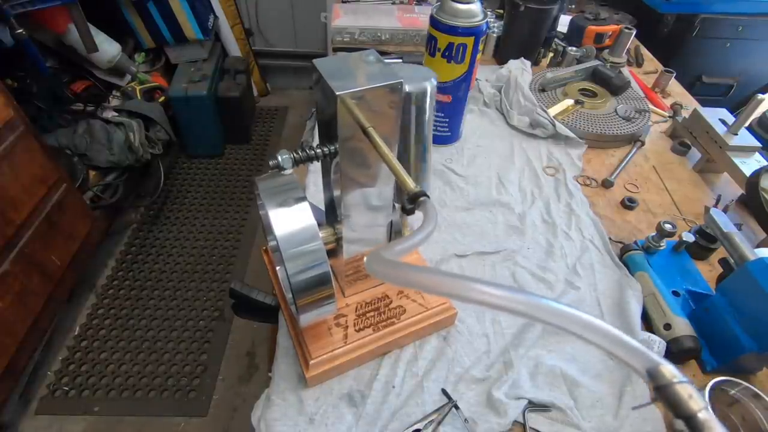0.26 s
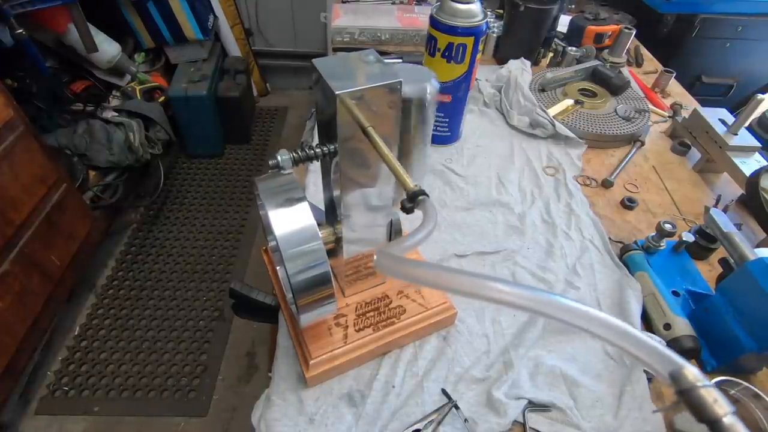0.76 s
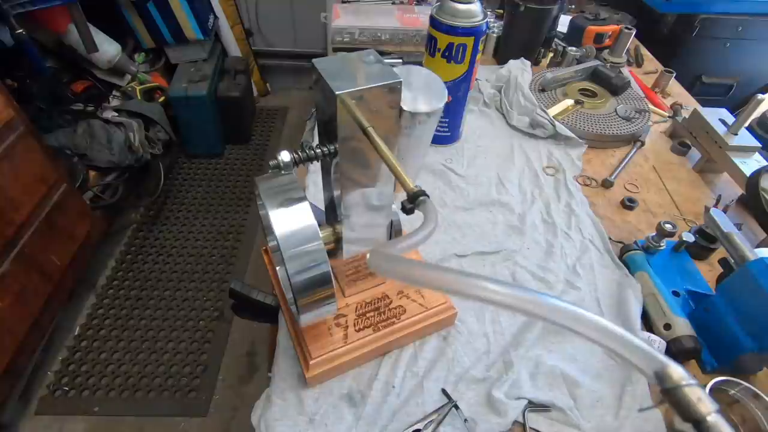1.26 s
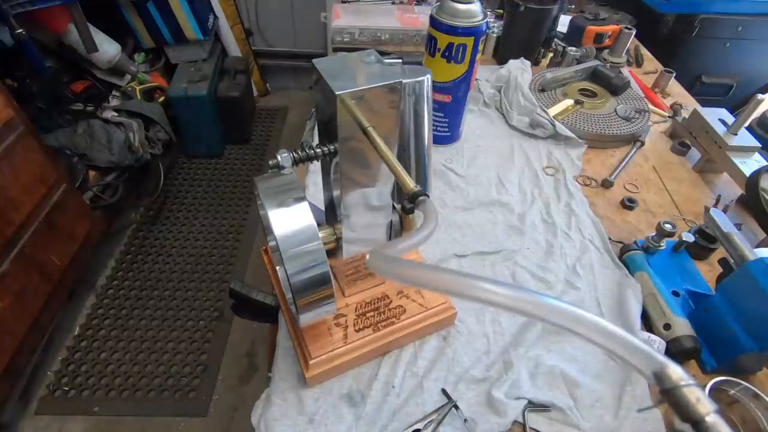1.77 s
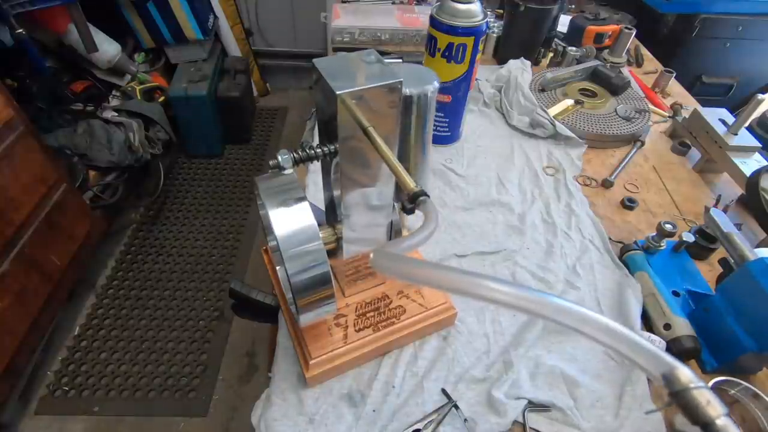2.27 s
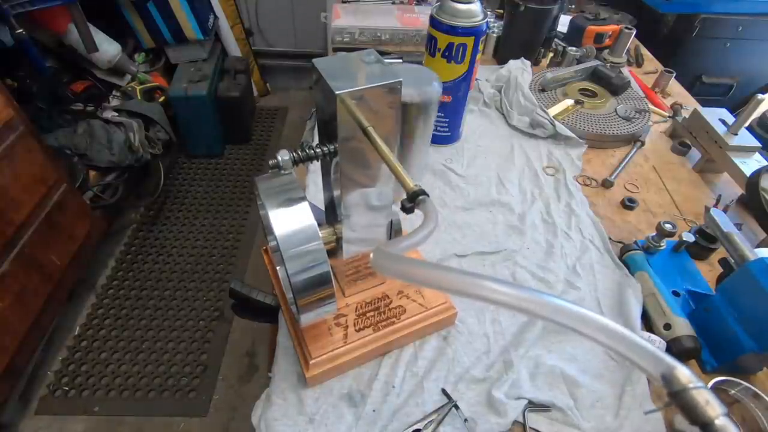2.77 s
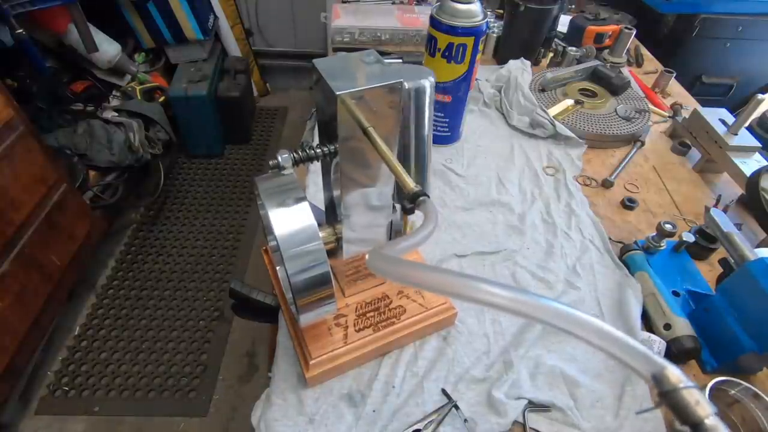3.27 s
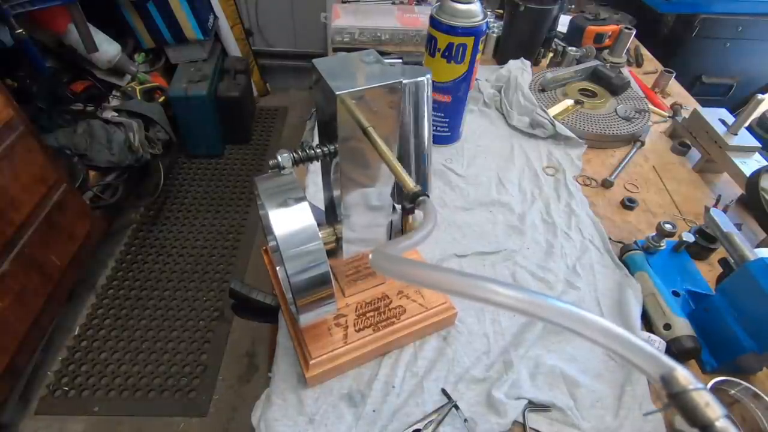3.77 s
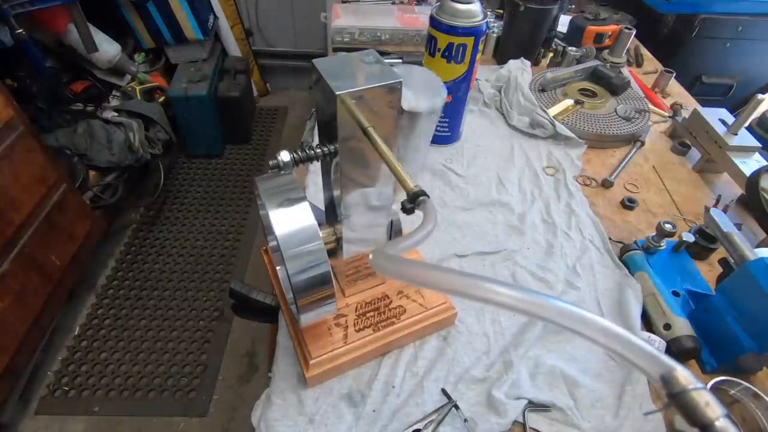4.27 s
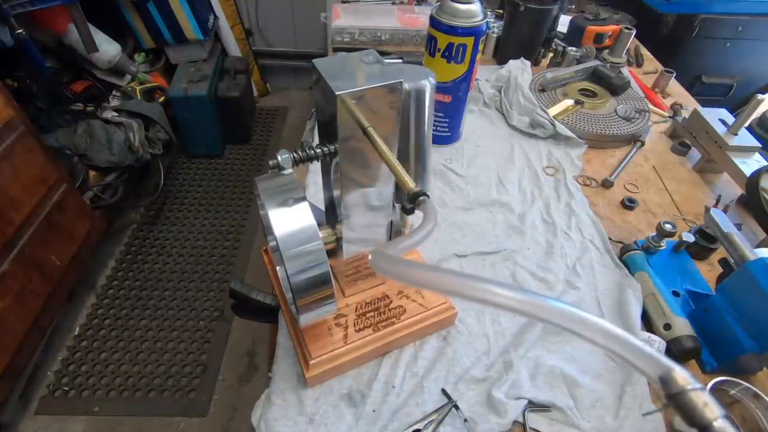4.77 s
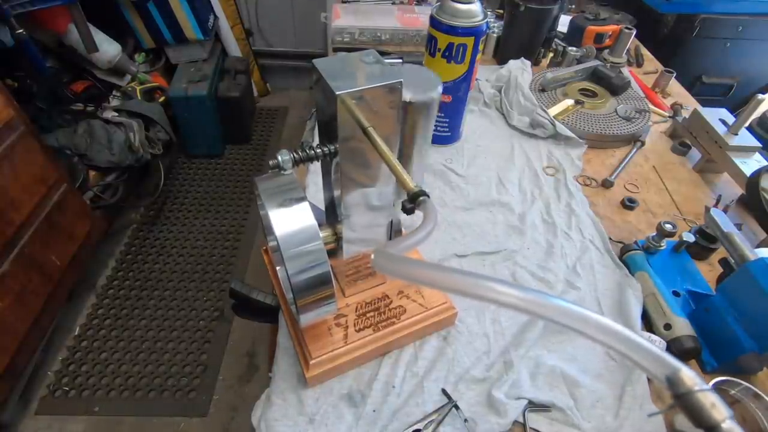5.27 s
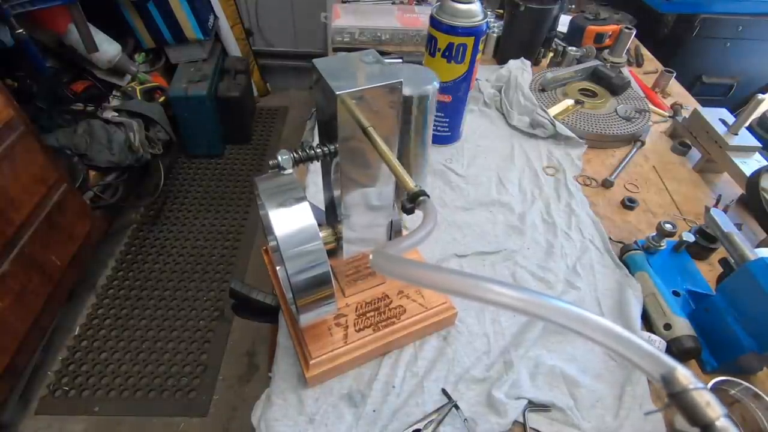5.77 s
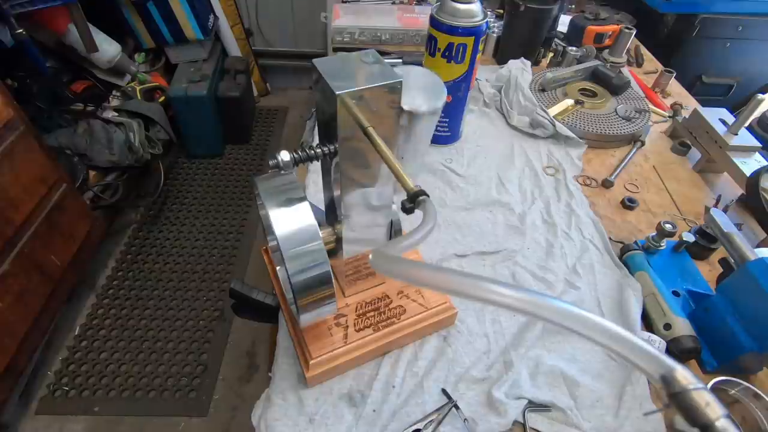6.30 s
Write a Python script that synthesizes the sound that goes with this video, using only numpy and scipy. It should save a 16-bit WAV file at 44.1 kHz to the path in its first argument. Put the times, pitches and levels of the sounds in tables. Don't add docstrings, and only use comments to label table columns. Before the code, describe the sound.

A tiny engine runs on compressed air close to the microphone, a buzzing stream of crisp double puffs with rattling metal and throbbing bench wood. The first two seconds are mostly fast and strong, with one quick sag. Then power and pace lurch up and down, hiss fading and bursting back, with sparse snaps near three and four seconds. One deep sag comes late, then a steadier, weaker chug in a small garage.

```python
import sys
import numpy as np
from scipy import signal
from scipy.fft import rfft, irfft, next_fast_len
from scipy.io import wavfile
from scipy.ndimage import uniform_filter1d

SR = 44100
rng = np.random.default_rng(int(sys.argv[2]) if len(sys.argv) > 2 else 0)


def transcribe(signal):
    frames = np.atleast_2d(signal).T
    limited = np.clip(frames, -1, 1)
    pcm = np.round(limited * 32767).astype(np.int16)
    wavfile.write(sys.argv[1], SR, pcm)


def volts_from_decibels(level):
    exponent = np.asarray(level, float) / 20
    return 10 ** exponent


N = 288394
TURN_COUNT = 128
CLOCK = np.arange(-.1, 6.7, .001)

# start_s, speed_turns_per_s
VALVE_MOVES = [(-0.215, 23.067), (0.03, 22.56), (0.28, 23.418), (0.677, 16.412), (0.934, 23.664),
               (1.27, 23.275), (1.472, 23.682), (1.738, 23.489), (2.296, 16.08), (2.485, 23.478),
               (2.67, 22.508), (2.782, 17.283), (2.964, 16.132), (3.141, 23.872), (3.306, 16.146),
               (3.574, 15.571), (3.879, 18.527), (4.101, 16.18), (4.296, 17.999), (4.45, 16.249),
               (4.746, 21.538), (4.88, 21.891), (5.152, 12.327), (5.433, 19.454), (5.64, 15.626),
               (5.78, 16.146), (6.094, 15.283)]


def flywheel_turns():
    start_turns, start_speed = .0012, 12.1019
    wheel_s, hose_s = .1555, .0495
    start_s, speed = np.transpose(VALVE_MOVES)
    since = np.maximum(CLOCK[:, None] - start_s, 0)
    wheel_lag = wheel_s ** 2 * (1 - np.exp(-since / wheel_s))
    hose_lag = hose_s ** 2 * (1 - np.exp(-since / hose_s))
    gained = since - (wheel_lag - hose_lag) / (wheel_s - hose_s)
    return start_turns + start_speed * CLOCK + gained @ np.diff(np.r_[start_speed, speed])


ANGLE = flywheel_turns()
PORT_SHUTS = np.interp(np.arange(TURN_COUNT + 1), ANGLE, CLOCK)
TURN_S = np.diff(PORT_SHUTS)
SPEED = 1 / TURN_S - 23.52
CRANK = np.interp(np.arange(N) / SR, PORT_SHUTS, np.arange(TURN_COUNT + 1))

# start_s, pressure_db
AIR = [(-.3, 1), (.3, 1), (.695, -10.5), (.925, 1), (1.3, 0.5), (2.289, -7.5), (2.478, -0.5), (2.57, .5),
       (2.78, -7.5), (2.95, -11.5), (3.127, 1), (3.305, -10), (3.75, -6.5), (3.86, -3.5), (3.93, -3),
       (4.1, -4.5), (4.25, -4.5), (4.789, 2), (4.92, -1), (5.165, -23), (5.429, 0), (5.574, -8.5),
       (6.1, -7.5)]
# full_air_db, db_per_air_db, db_per_turn_per_s, delay_turns, drop_hold_s
ANSWERS = [
    (-22, 1.0, 0, 0.058, 0),
    (-28.5, 3, -0.15, 0.87, 0.043),
    (-24, 1.05, -0.12, 0.9, 0.0072),
    (-27, .9, -0.96, 1.0, 0.021),
    (-31.5, 0.93, -0.03, 0.78, 0.041),
]
# what is kept while the wheel coasts, level_db
COAST_DB = np.array([-46, -53.5, -36.5, -32.0, -44.5])
UNEVEN_DB = np.array([0.69, 0.95, 0.42, 0.57, 1.0])
MOST_DB = np.array([-16.5, -26.0, -20, -18, -31.5])


def turn_forces():
    fill_s, empty_s = 0.02, 0.056
    full_db, per_air, per_speed, delay, hold_s = np.transpose(ANSWERS)
    air_s, air_db = np.transpose(AIR)
    step_db = np.diff(np.r_[0, air_db])
    felt_s = np.interp(np.arange(TURN_COUNT)[:, None] + 1 - delay, ANGLE, CLOCK)
    waited = np.maximum(felt_s[..., None] - air_s - hold_s[:, None] * (step_db < 0), 0)
    felt_db = (1 - np.exp(-waited / np.where(step_db > 0, fill_s, empty_s))) @ step_db
    steady_db = full_db + per_air * felt_db + per_speed * SPEED[:, None]
    return np.clip(steady_db, COAST_DB, MOST_DB) + UNEVEN_DB * rng.standard_normal((TURN_COUNT, 5))


FORCES = turn_forces()
EXHAUST, CLANK, BENCH, BASE, SCRAPE = range(5)


def rms_one(x):
    return x / np.sqrt(np.mean(x ** 2) + 1e-20)


def per_turn(source, centre):
    return np.interp(CRANK, np.arange(TURN_COUNT) + centre, FORCES[:, source])


def port(shape, late=0):
    angle, level_db = np.transpose(shape)
    return volts_from_decibels(np.interp((CRANK - late) % 1 + late, angle, level_db, left=-70, right=-70))


def flicker(rate_hz):
    return rms_one(signal.sosfilt(signal.butter(2, rate_hz, fs=SR, output="sos"), rng.standard_normal(N)))


# frequency_hz, likeness
LIKENESS = [(60, 1), (130, 1), (290, -0.43), (640, -1.23), (1400, 0.37), (3090, 0.98), (6790, 0.53),
            (14900, 0.13)]
# frequency_hz, left_minus_right_db
LEANING = [(60, 10), (180, 3), (550, 2.5), (1640, 0), (4950, -0.5), (14900, -3)]


def coloured(pair, spectrum):
    size = next_fast_len(N + 4096)
    log_hz = np.log(np.fft.rfftfreq(size, 1 / SR) + 1)

    def at(table):
        hz, value = np.transpose(table)
        return np.interp(log_hz, np.log(hz), value)

    alike, gain = np.clip(at(LIKENESS), -1, 1), volts_from_decibels(at(spectrum))
    mid, side = rfft(pair, size) * np.sqrt([(1 + alike) / 2, (1 - alike) / 2])
    lean = volts_from_decibels(at(LEANING) * np.array([[.5], [-.5]]))
    level = gain / np.sqrt(np.mean(gain ** 2))
    return irfft(np.array([mid + side, mid - side]) * lean * level, size)[:, :N]


def blows(pattern, level_db, jitter_s, spread_db):
    angle, strength = np.transpose(pattern)
    turns = np.arange(TURN_COUNT)[:, None] + angle
    luck = rng.standard_normal((TURN_COUNT, len(pattern), 2))
    when = np.interp(turns, np.arange(TURN_COUNT + 1), PORT_SHUTS) + jitter_s * luck[..., 0]
    at = np.round(when * SR).astype(int)
    size = strength * volts_from_decibels(level_db[:, None] + spread_db * luck[..., 1])
    inside = (at >= 0) & (at < N)
    return np.bincount(at[inside], size[inside], N) + 1e-18


def ring(clicks, hz, t60):
    r = volts_from_decibels(-60 / (t60 * SR))
    pole = r * np.exp(2j * np.pi * hz / SR)
    return signal.lfilter([np.e * (1 - r)], [1, -2 * pole, pole ** 2], clicks)


def at_ports(swing, lean_db, lead_rad):
    return np.imag([swing * volts_from_decibels(lean_db) * np.exp(1j * lead_rad), swing])


def wood(clicks, modes):
    out = 0
    for k, (hz, level_db, t60, lean_db, lead_rad) in enumerate(modes):
        out = out + at_ports((-1) ** k * volts_from_decibels(level_db) * ring(clicks, hz, t60), lean_db, lead_rad)
    return out


# frequency_hz, density_db
STILL_AIR = [(20, -16), (40, 8), (115, 4), (314, 7), (420, -28), (1000, -25), (2130, -65), (6620, -53),
             (12000, -60)]


def still_air():
    return volts_from_decibels(-39) * coloured(rng.standard_normal((2, N)), STILL_AIR)


def garage_echoes(x):
    t60_s, level_db, cut_hz = .25, -15.5, 4550
    s = np.arange(int(t60_s * SR)) / SR
    tail = rng.standard_normal((2, len(s))) * volts_from_decibels(-60 * s / t60_s) * np.clip(s / 0.0059 - 1, 0, 1)
    tail = signal.sosfilt(signal.butter(2, cut_hz, fs=SR, output="sos"), tail)
    tail = unit_energy(tail)
    return volts_from_decibels(level_db) * signal.fftconvolve(x, tail, axes=1)[:, :N]


def unit_energy(tail):
    return tail / np.sqrt(np.sum(tail ** 2, axis=1, keepdims=True))


BENCH_BLOWS = [(.33, 0.62), (.62, -0.51), (.86, 0.65)]
# frequency_hz, level_db, t60_s, left_minus_right_db, left_lead_rad
LEGS = [(34, -3, .3, -11, -2.0), (49, -9, .14, -9, -2.5)]


def legs():
    level_db = .5 * FORCES[:, BENCH] - 17.5 + 600 * (TURN_S - .055)
    return wood(blows(BENCH_BLOWS, level_db, jitter_s=.0008, spread_db=2.5), LEGS)


# frequency_hz, level_db, t60_s, left_minus_right_db, left_lead_rad
BENCH_TOP = [(61.4, -11, 0.2, -17, 0.5), (93.55, 1.5, 0.099, -4, -2), (138.2, -8, 0.087, -8, 0.84)]


def bench():
    swing = wood(blows(BENCH_BLOWS, np.zeros(TURN_COUNT), jitter_s=.0002, spread_db=.8), BENCH_TOP)
    reach = np.sqrt(uniform_filter1d(np.mean(swing ** 2, axis=0), size=4500) + 0.012)
    return swing / reach * volts_from_decibels(per_turn(BENCH, centre=0.27) + 4.0)


SHAKE_MULTIPLES = [1, 2, 3, 5]
# full_speed_db, db_per_turn_per_s, left_minus_right_db, left_lead_rad
SHAKE = [(-35, -2.5, -27, -3.5), (-23, -0.5, -4, -3), (-25.5, 2.5, -17, -1.5), (-31, -0.4, -12, -1.5)]


def unbalance():
    speed = np.interp(CRANK, np.arange(TURN_COUNT) + .5, SPEED)
    force_db = per_turn(BENCH, centre=0.41) - ANSWERS[BENCH][0]
    out = 0
    for multiple, (level_db, per_speed, lean_db, lead_rad) in zip(SHAKE_MULTIPLES, SHAKE):
        swing = volts_from_decibels(level_db + per_speed * speed + force_db) * np.exp(2j * np.pi * multiple * CRANK)
        out = out + at_ports(swing, lean_db, lead_rad)
    return out


BASE_BLOWS = [(.33, 1.0), (.52, .15), (.8, -.35), (.96, .3)]
# frequency_hz, level_db, t60_s, left_minus_right_db, left_lead_rad
BOARD = [(123.54, 0.5, 0.18, -9, 4.48), (289, -1, 0.051, -7, 4.7), (320.8, -5, 0.098, -12.5, 4.2),
         (364, -16, 0.058, -3, 0.5)]
# frequency_hz, level_db, t60_s, left_minus_right_db, left_lead_rad
BLOCK = [(56.4, -2.5, 0.049, -6, 0.81), (169.7, 0, 0.088, -3.5, 1.7), (182.8, -2, 0.049, -2, 1.9),
         (207.6, -3.5, 0.078, 2.5, 0.13), (240, -26, 0.02, -7, 0.23), (263.1, 2, 0.081, -11, 1.46)]


def base():
    uneven = dict(jitter_s=.0001, spread_db=.8)
    thump_db = FORCES[:, BASE]
    block_db = 0.6 * thump_db + 0.38 * FORCES[:, CLANK] + 5
    board = wood(blows(BASE_BLOWS, thump_db + 6.0, **uneven), BOARD)
    return board + wood(blows(BASE_BLOWS, block_db, **uneven), BLOCK)


# frequency_hz, level_db, t60_s, left_minus_right_db, left_lead_rad
FRAME = [(429, -22, 0.039, 5.5, -1.87), (444.6, -8, 0.023, 3.5, -1.5), (481, -9.5, 0.059, 5.5, -2.5),
         (506, -8, 0.013, 0, -1.5), (633, -15.5, 0.064, -3.5, -1.2), (698.7, -12, 0.047, 2, 2),
         (767.6, -11.5, 0.042, -34, 16), (860.7, -7, 0.041, -16, 2.5), (923, -7, 0.023, 3, 2.5),
         (1193, -9.5, 0.042, -4, 2.5), (1424, -5.5, 0.035, -4, 2.5)]


def frame():
    spot_count = 14
    spots = np.c_[np.sort(rng.random(spot_count)), rng.standard_normal(spot_count)]
    return wood(blows(spots, FORCES[:, SCRAPE] + 0.1, jitter_s=.00009, spread_db=2.5), FRAME)


# start_s, level_db, pitch_hz
TICKS = [
    (3.157, -21, 3800),
    (3.894, -17.5, 1400),
    (3.968, -22, 880),
]


def ticks():
    out = np.zeros(N)
    for start_s, level_db, pitch_hz in TICKS:
        click = (np.arange(N) == round(start_s * SR)) + 1e-18
        out += volts_from_decibels(level_db) * np.imag(ring(click, pitch_hz, 0.01))
    return out


# crank_turns, level_db
SCRAPE_STROKE = [(0.0, 4), (.12, -17), (.24, -8), (.32, -1), (.55, 2), (.7, -1.5), (.88, -1), (.95, -4),
                 (1.0, 3)]
# frequency_hz, density_db
SCRAPE_BODY = [(300, 0), (490, 0), (600, -1.5), (870, -6.5), (1050, 0.5), (1400, -3), (1650, -5.5),
               (1930, -2.5), (2600, -11), (3800, -20.5), (6000, -38.5)]


def scrape():
    present = rng.random((2, N)) < 4000 / SR
    size = volts_from_decibels(3.44 * np.minimum(rng.exponential(1, (2, N)), 5))
    grains = present * size * rng.choice([-1, 1], (2, N))
    stroke = port(SCRAPE_STROKE) * volts_from_decibels(per_turn(SCRAPE, centre=0.82) + 5.0 + 2.0 * flicker(117))
    return coloured(rms_one(grains) * stroke, SCRAPE_BODY)


HIT = [(.285, 0.58)]
BOUNCES = [(.47, 0.32), (.6, 0.27)]
# frequency_hz, level_db, t60_s
CYLINDER = [(1925, -10.5, 0.021), (2520, -5, 0.0048), (3310, -7.5, 0.014), (3666, 0, 0.0071),
            (3844, 0.5, 0.0095), (4760, -12.5, 0.014), (6500, -29, 0.0058)]


def clank():
    uneven = dict(jitter_s=.0004, spread_db=1.5)
    level_db = FORCES[:, CLANK] + 13
    bounce_db = np.clip(-3 - 1100 * (TURN_S - .043), -10, -2)
    hits = blows(HIT, level_db, **uneven) + blows(BOUNCES, level_db + bounce_db, **uneven)
    strength = volts_from_decibels(1.5 * rng.standard_normal((len(CYLINDER), N)))
    out = 0
    for (hz, mode_db, t60), own in zip(CYLINDER, strength):
        out = out + volts_from_decibels(mode_db) * np.imag(ring(hits * own, hz, t60))
    return out * volts_from_decibels([[-.3], [.3]])


# crank_turns, level_db
FIRST_BLOW = [(.71, -30), (.735, -7), (.76, 0), (.9, 0), (.97, -20)]
# crank_turns, level_db
SECOND_BLOW = [(.8, -30), (.865, -8), (.91, -2), (.94, 0), (.975, -3), (1.0, -10), (1.03, -30)]
# crank_turns, level_db
LEAK = [(0.0, 11), (.12, -1.5), (.3, 3.5), (.5, -1.5), (.68, -4), (1.0, -25.5)]
# frequency_hz, density_db
FIRST_AIR = [(1500, -30), (3000, -3.5), (4300, 0), (5200, 1), (6800, 3.5), (8000, -10.5), (9500, -4),
             (12000, -23), (15500, -47)]
# frequency_hz, density_db
SECOND_AIR = [(700, -9), (1800, -11), (3500, -2.5), (5000, -6), (6800, 0), (8000, -6), (9500, -2),
              (11500, -15.5), (14200, -25), (15600, -54)]
# frequency_hz, density_db
LEAK_AIR = [(1500, -11), (3000, 1), (4500, -6), (6800, 0.5), (8000, -5), (9700, -6), (11500, -17),
            (15500, -60)]


def exhaust():
    period = np.interp(CRANK, np.arange(TURN_COUNT) + .5, TURN_S)
    fade_db = -10 * np.maximum(CRANK % 1 - .76, 0) * period / .008
    trapped_db = per_turn(EXHAUST, centre=1.2) - 4
    slow_db = 200 * (period - .05)
    swept_db = per_turn(EXHAUST, centre=0.72)
    leak_db = 0.63 * swept_db + 0.3 * per_turn(CLANK, centre=0.85) - 16.0
    first = port(FIRST_BLOW) * volts_from_decibels(trapped_db + slow_db + fade_db + 0.89 * flicker(130))
    second = port(SECOND_BLOW, late=.1) * volts_from_decibels(swept_db + 2.9 * flicker(200))
    leak = port(LEAK) * volts_from_decibels(leak_db + 0.81 * flicker(120))
    white = rng.standard_normal((3, 2, N))
    air = coloured(white[0] * first, FIRST_AIR)
    air = air + coloured(white[1] * second, SECOND_AIR)
    air = air + coloured(white[2] * leak, LEAK_AIR)
    return volts_from_decibels(6.5) * air


def scene():
    bright = exhaust() + clank() + scrape() + ticks()
    shaken = frame() + base() + bench() + legs() + unbalance()
    return bright + garage_echoes(bright) + shaken + still_air()


def roll_off(x):
    return signal.sosfilt(signal.butter(12, 15800, fs=SR, output="sos"), x)


def record(dry):
    rounded = 0.84 * np.tanh(dry / 0.95)
    rounded = signal.sosfilt(signal.butter(2, 24, "high", fs=SR, output="sos"), rounded)
    cut = signal.sosfilt(signal.cheby2(10, 60, 16600, fs=SR, output="sos"), rounded)
    return roll_off(cut)


dry = scene()
out = record(dry)
transcribe(out)
```